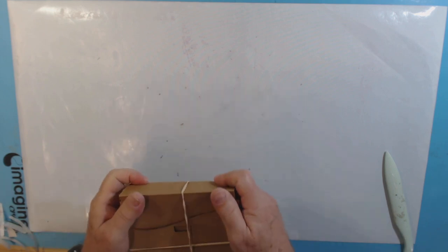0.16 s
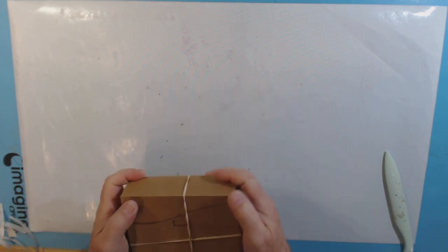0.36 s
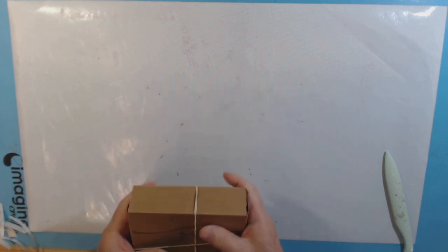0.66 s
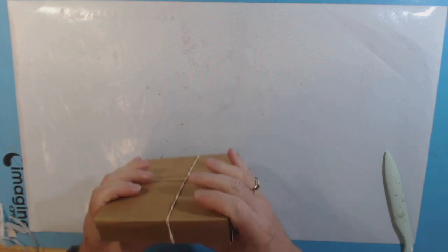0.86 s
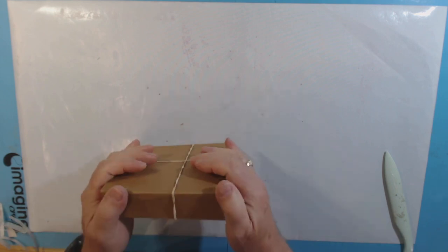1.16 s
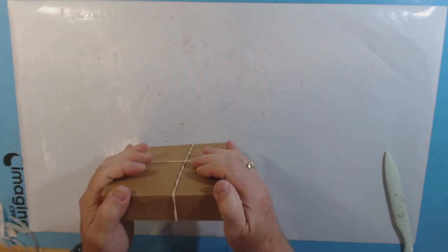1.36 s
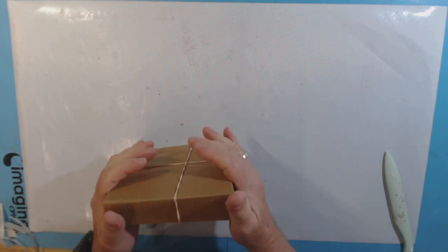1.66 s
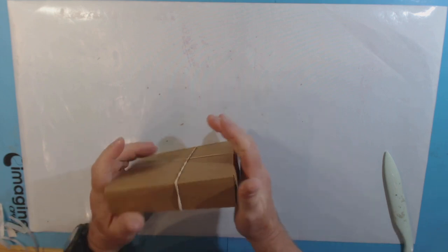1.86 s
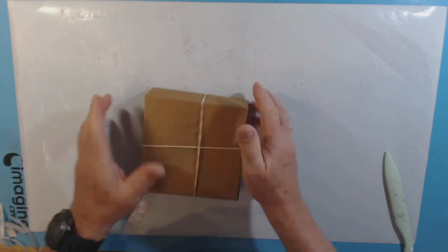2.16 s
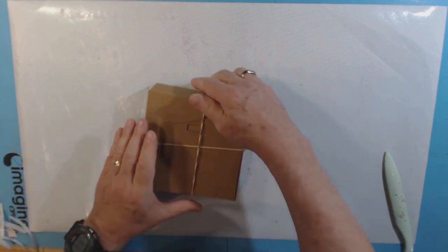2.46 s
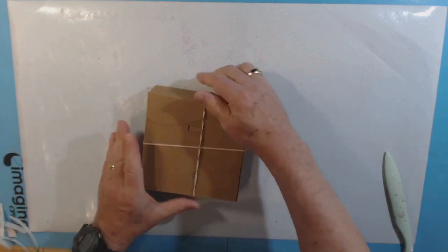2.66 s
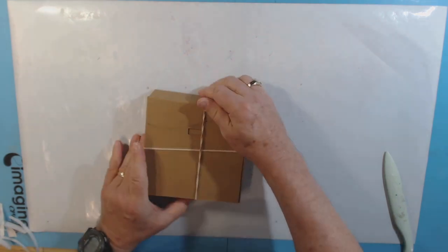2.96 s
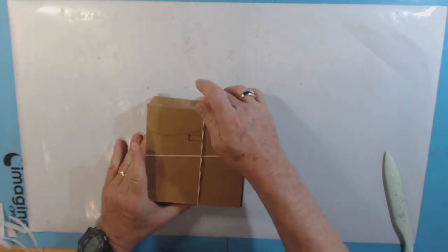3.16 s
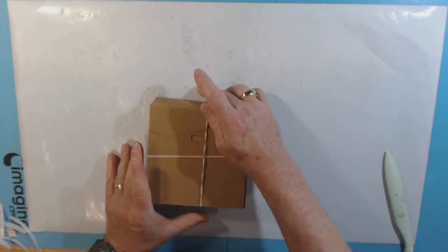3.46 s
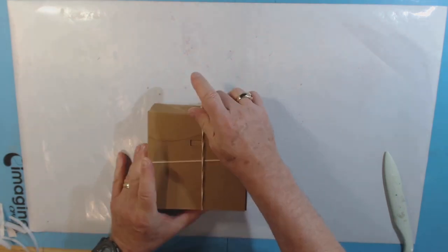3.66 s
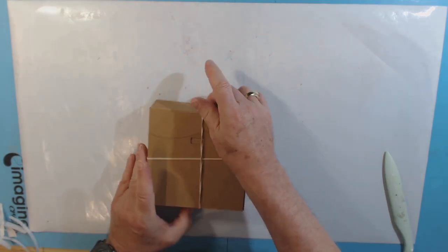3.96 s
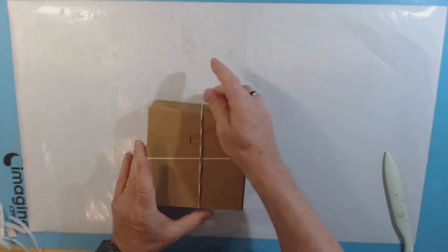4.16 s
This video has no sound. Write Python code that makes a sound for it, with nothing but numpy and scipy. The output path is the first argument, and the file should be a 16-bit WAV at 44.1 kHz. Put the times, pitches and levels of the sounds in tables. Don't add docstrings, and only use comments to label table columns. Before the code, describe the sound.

A folded cardboard box is turned, tapped and dropped on a table, ringing boxy in the mid range. Fingers scrape and rub the card between knocks, with small nail clicks. After a quieter middle and a landing at about 2.3 seconds, bands smack the card hard from 3.2 seconds to the end. Close, narrow webcam sound, almost mono, short room echoes, noise suppression swallowing the tails, hardest snaps distorting.

```python
import sys
import numpy as np
from scipy import signal
from scipy.fft import rfft, irfft, next_fast_len
from scipy.io import wavfile
from scipy.ndimage import uniform_filter1d, map_coordinates

SR = 44100
rng = np.random.default_rng(int(sys.argv[2]) if len(sys.argv) > 2 else 0)


def digitize_waveform(pressure):
    field = np.atleast_2d(pressure).T
    bounded = np.clip(field, -1, 1)
    quanta = np.round(bounded * 32767).astype(np.int16)
    wavfile.write(sys.argv[1], SR, quanta)


def boost(x):
    u = np.asarray(x, float) / 20
    return 10 ** u


N = 190335
SPAN = 8192

# pitch in Hz, width in Hz, level in dB.
BOX_MODES = [(385, 43, 5), (527.3, 78, 6.5), (621.4, 72, 3), (739, 31, 4.5), (934, 140, 0),
             (1000, 110, -3.5), (1260, 240, 0), (1390, 420, -17.5)]
# pitch in Hz, width in Hz, level in dB.
TABLE_MODES = [(100, 37, -11), (152, 61, 0), (248, 73, 4.5)]
# frequency in Hz, level in dB.
SKIN_COLOUR = [(880, -8.5), (1500, -8), (1740, -10), (2320, -9.5), (2530, -8.5), (3860, -14), (6100, -16),
               (7560, -20.5), (8300, -36.5), (10800, -73), (18300, -120)]
# frequency in Hz, level in dB.
CARD_COLOUR = [(590, -24.5), (1000, 3.5), (1140, -6.5), (1350, 7.5), (1540, -2.5), (2090, 2.5), (3910, -3),
               (6540, -3), (7660, -19), (8300, -44), (10800, -94), (18300, -120)]
# frequency in Hz, level in dB.
HUSH_COLOUR = [(15, -38.5), (30, -27.5), (100, -9), (300, -5), (600, -2), (1000, -5.5), (2500, -13),
               (5000, -18.5), (7500, -19.5), (8300, -42.5), (11000, -90)]
# frequency in Hz, time to fall 60 dB in seconds.
ROOM_FADE = [(150, 0.11), (600, 0.093), (2000, 0.11), (7000, 0.073)]
# frequency in Hz, side minus mid in dB.
PORT_SPREAD = [(100, -12.5), (500, -26), (1200, -20), (2200, -27.5), (3600, -20), (4600, -31), (6000, -25),
               (7600, -35)]
# frequency in Hz, left minus right in dB.
PORT_LEAN = [(100, 0), (300, 1.5), (600, 0.34), (1200, 0.26), (2200, 1), (6000, 1)]
# frequency in Hz, threshold in dB a bin.
GATE_THRESHOLD = [(100, -82), (250, -76.5), (500, -64.5), (2000, -67.5), (7000, -80)]
# time in seconds, level in dB.
ROOM_LEAK = [(0.0, -51), (0.1, -53.5), (0.34, -59), (0.83, -64.5), (1.12, -67), (1.67, -70), (1.83, -51),
             (1.96, -66), (2.27, -63), (2.41, -80.5), (2.64, -68.5), (3.15, -67), (3.26, -56.5),
             (3.42, -49.5), (3.5, -57.5), (3.65, -68), (4.0, -64), (4.17, -75.5)]
# start in seconds, peak in dB, pitch in Hz, length in seconds.
PORT_JOLTS = [
    (1.929, -31, 720, 0.0021),
    (2.314, -26, 291, 0.0085),
    (3.199, -3, 71.6, 0.002),
    (3.436, -4.5, 382, 0.0016),
    (3.825, -5, 500, 0.00079),
    (4.152, -11, 384, 0.00072),
]
# start
# in seconds, level in dB, pitch in Hz, time to fall 60 dB in seconds.
LOW_TONES = [
    (0.376, -33, 221, 0.059),
    (1.143, -29, 152, 0.39),
    (1.301, -47.5, 100, 0.17),
    (1.811, -44, 119, 0.19),
    (2.076, -40, 136, 0.18),
    (2.323, -22, 139.3, 0.2),
    (2.575, -43, 137, 0.05),
    (4.153, -22.5, 163.4, 0.058),
]
# start in seconds, box peak in dB, struck panel in Hz,
# table thud in dB.
THUMP_EVENTS = [(0.054, -17, 565, -31.5), (0.624, -19.5, 624, -40.5), (1.1404, 1, 477.7, -12.5),
                (1.281, -30.5, 349, -37.5), (1.806, -21, 365, -33), (2.071, -21.5, 556, -29.5),
                (2.318, -5, 405, -15.5), (2.416, -21, 367, -28), (3.365, -24, 535, -44),
                (3.603, -23.5, 385, -46.5), (3.981, -21, 366, -60.5)]
# start in seconds, box peak in dB, struck panel in Hz,
# table thud in dB, room in dB.
BAND_EVENTS = [
    (3.198, -3, 419, -8, -14),
    (3.375, -10.5, 650, -40.5, -16.5),
    (3.437, -9.5, 332.5, -27.5, -25.5),
    (3.777, -26.5, 636, -46, -6),
    (3.824, -19, 637, -24.5, -32),
    (3.92, -4, 611, -52, -13.5),
    (4.001, -21, 766, -39, -6.5),
    (4.149, -2, 724, -12.5, -5),
]
# start in seconds, box peak in dB, struck panel in Hz.
PAT_EVENTS = [(0.519, -30, 560), (0.555, -5.5, 571), (0.557, -18, 1008), (0.634, -26, 623),
              (0.979, -34.5, 695), (1.293, -28.5, 850), (1.449, -46, 308), (1.513, -41, 382),
              (1.555, -39, 900), (1.594, -22.5, 560), (2.696, -14.5, 581), (2.914, -27.5, 394),
              (3.201, -9.5, 760), (3.438, -13, 656), (3.73, -39, 483), (3.954, -18.5, 578),
              (4.152, -5.5, 502), (4.288, -35, 425)]
# start in seconds, box peak in dB, struck panel in Hz.
TAP_EVENTS = [(0.076, -22, 590), (0.696, -30, 703), (0.808, -24.5, 407), (0.922, -34.5, 709),
              (1.385, -40, 377), (1.726, -33, 385), (1.925, -25, 870), (2.239, -22, 737), (2.325, -7, 845),
              (2.425, -34.5, 954), (2.666, -34.5, 385), (2.803, -17, 776), (2.972, -27, 385),
              (3.31, -27.5, 483), (3.526, -30, 550), (3.558, -15, 752), (3.902, -28, 388)]
# start in seconds, peak in dB, centre in Hz, treble in dB,
# burst length in seconds.
SNAP_EVENTS = [(0.0764, -6.5, 5450, -3.5, 0.0016), (1.1428, -13, 1090, -25, 0.0024),
               (1.924, -5.5, 2900, -11, 0.003), (2.2434, -12.5, 1150, -10.5, 0.0011),
               (2.3214, -10, 1263, -33, 0.0049), (2.3426, -17.5, 1590, -7, 0.0017),
               (2.8021, -22.5, 1270, -31, 0.0034), (3.1977, 2, 1260, -17, 0.0045),
               (3.3666, -7, 2030, -11, 0.0025), (3.3756, -10.5, 3260, -12.5, 0.0015),
               (3.4375, -2, 4625, -9.5, 0.0024), (3.5571, -11, 1390, -53.5, 0.003),
               (3.6052, -14.5, 1860, -18, 0.0021), (3.7762, -18.5, 1270, -9, 0.0039),
               (3.8237, -1.5, 1667, -12.5, 0.0015), (3.922, -7.5, 1270, -18.5, 0.0034),
               (4.1501, 0.5, 1540, -11, 0.01)]
# start in seconds, peak in dB, centre in Hz, treble in dB.
CLICK_EVENTS = [(0.0562, -10.5, 4180, -27), (0.1453, -22.5, 1360, -22), (0.5019, -36.5, 2380, -24),
                (0.5568, -25, 2470, -23), (0.629, -28.5, 2670, -15.5), (0.6977, -28.5, 2970, -24),
                (0.8067, -17.5, 2250, -54.5), (0.9034, -37, 1340, -8), (0.925, -29, 3170, -2.5),
                (1.267, -39.5, 2490, -10.5), (1.293, -35.5, 1997, -38.5), (1.363, -42, 4500, -12.5),
                (1.449, -39, 1450, -30), (1.8078, -25, 3000, -12), (2.4286, -39, 1220, -21),
                (2.698, -28.5, 1263, -20.5), (2.98, -33, 1490, -25.5), (3.0688, -42.5, 2340, -22),
                (3.731, -46.5, 1100, 1), (4.0008, -16.5, 1103, -20.5)]
# fullest moment in seconds, swell in seconds, box
# hum in dB, scrape in dB.
SLIDE_STROKES = [(0.187, 0.034, -38.5, -35), (0.3807, 0.024, -26.5, -29.5), (.76, 0.14, -50, -55),
                 (1.605, 0.032, -49, -55), (2.082, 0.017, -34, -38), (1.829, 0.033, -41, -44),
                 (1.92, 0.002, -46.5, -36), (1.765, 0.031, -57, -43), (3.762, 0.029, -36.5, -55),
                 (1, 0.0089, -36, -61), (3.196, 0.0026, -26, -29.5), (6, 0.0024, -41, -27)]
# fullest moment in seconds, swell in seconds, box hum in dB,
# scrape in dB.
RUB_STROKES = [(0.121, 0.098, -39, -49.5), (.265, 0.043, -38, -40), (0.438, 0.046, -38, -46.5),
               (0.658, 0.043, -57.5, -62.5), (1.298, 0.028, -45, -47), (2.631, 0.042, -47, -54.5),
               (3.329, 0.048, -37, -49), (3.53, 0.035, -46.5, -41.5), (3.021, 0.047, -32, -45.5),
               (3.13, 0.03, -61.5, -52.5), (4.302, 0.038, -47, -54.5)]
# fullest moment in seconds, swell in seconds, box hum in dB,
# scrape in dB.
CREEP_STROKES = [
    (1.019, 0.087, -54, -54.5),
    (1.135, 0.012, -49.5, -48),
    (1.575, 0.038, -48.5, -54),
    (1.901, 0.06, -49, -49),
    (2.8, 0.017, -40.5, -46),
    (2.155, 0.068, -44.5, -49),
    (2.923, 0.023, -38, -49.5),
    (3.089, 0.021, -49.5, -53.5),
    (3.808, 0.036, -39, -43.5),
]
# fullest moment in seconds, swell in seconds, box hum in dB,
# scrape in dB.
DRAG_STROKES = [
    (0.047, 0.021, -34, -35.5),
    (0.511, 0.02, -41, -48),
    (2.328, 0.0081, -23.5, -27),
    (3.42, 0.019, -37.5, -42.5),
    (3.96, 0.021, -40, -48.5),
]

THUMP_S, BAND_S, PAT_S, TAP_S, CLICK_S = 0.0031, 0.0028, 0.004, 0.0036, 0.0024
THUMP_ROOM_DB, ROOM_PER_DB, PAT_ROOM_DB, TAP_ROOM_DB = -6.5, -0.2, -8.5, -0.57
CLICK_ROOM_DB, SNAP_ROOM_DB = -0.5, -4.5
FINGER_THUD_DB = -44
STREAK_DB = 3.3
# (fade over swell, hiss over scrape in dB)
SLIDE, RUB, CREEP, DRAG = (0.89, -6.5), (0.72, -27), (0.41, -13), (2.83, -11.5)


def unit(x):
    return x / np.sqrt(np.mean(x ** 2) + 1e-20)


def strongest(x):
    return x / np.sqrt(np.abs(uniform_filter1d(x ** 2, size=220)).max() + 1e-20)


def along(points, hz):
    f, v = np.transpose(points)
    return np.interp(np.log(hz + 1), np.log(f + 1), v)


def filtered(x, response):
    n = x.shape[-1]
    m = next_fast_len(n + 8192)
    return irfft(rfft(x, m) * response(np.fft.rfftfreq(m, 1 / SR)), m)[..., :n]


def resonance(f, centre, width):
    return 1j * f * width / (centre * centre - f * f + 1j * f * width)


def resonances(modes):
    return lambda f: sum((-1) ** k * boost(db) * resonance(f, centre, width)
                         for k, (centre, width, db) in enumerate(modes))


def wobble(rate):
    knots = rng.standard_normal(int(N * rate / SR) + 4)
    return map_coordinates(knots, [np.arange(N) * rate / SR])


def patchy(shape, over_hz, over_time):
    blurred = uniform_filter1d(rng.standard_normal(shape), size=over_hz, axis=-2)
    return unit(uniform_filter1d(blurred, size=over_time, axis=-1))


def tail(late_db, late_t60, hold_s):
    hz, t, z = signal.stft(rng.standard_normal((2, SPAN)), SR, nperseg=256)
    early = boost(-60 * t / along(ROOM_FADE, hz)[:, None])
    fade = early + boost(late_db - 60 * t / late_t60)
    streaks = STREAK_DB * patchy(fade.shape, 2, 24)
    uneven = 2.5 * rng.standard_normal((len(hz), 1))
    letting_go = 10 * (t / hold_s) ** 4
    fade = fade * boost(streaks + uneven - letting_go)
    return signal.istft(z * fade, SR, nperseg=256)[1][:, :SPAN]


def add(out, s, near, colour, room_db):
    hold_s = 0.11 * np.abs(near).max() ** 0.3 + 0.024
    answer = filtered(tail(late_db=-19, late_t60=0.51, hold_s=hold_s), colour)
    answer *= boost(room_db) * np.linalg.norm(near) / np.linalg.norm(answer[0])
    start = round(s * SR)
    out[0, start:start + SPAN] += near
    out[:, start + 220:start + 220 + SPAN] += answer


def hush():
    z = signal.stft(rng.standard_normal((2, N)), nperseg=512)[2]
    flutter = boost(1.2 * patchy(z.shape[1:], 5, 4))
    noise = signal.istft(z * flutter, nperseg=512)[1][:, :N]
    leak_db = np.interp(np.arange(N) / SR, *np.transpose(ROOM_LEAK)) + 4 + 2.2 * wobble(30)
    return boost(leak_db) * unit(filtered(noise, lambda hz: boost(along(HUSH_COLOUR, hz))))


def stroke_rows():
    kinds = [(SLIDE_STROKES, SLIDE), (RUB_STROKES, RUB), (CREEP_STROKES, CREEP), (DRAG_STROKES, DRAG)]
    return [(s, swell, swell * fade, hum, scrape, scrape + hiss)
            for rows, (fade, hiss) in kinds for s, swell, hum, scrape in rows]


def rubbing():
    t, press = np.arange(N) / SR, np.zeros((3, N))
    for s, swell, fade, *levels in stroke_rows():
        shape = np.exp(-((t - s) / np.where(t < s, swell, fade)) ** 2)
        press += np.outer(boost(levels), shape)
    slips = boost(1.4 * wobble(45) + 3 * wobble(400)) * rng.standard_normal((2, N))
    clumps = boost(3.5 * wobble(40)) * rng.standard_normal((2, N))
    box = resonances(BOX_MODES[:6])
    hum = unit(filtered(clumps, lambda f: box(f) * resonance(f, 710, 860) ** 2))
    scrape = unit(filtered(slips, lambda hz: boost(along(CARD_COLOUR, hz)) / (1 + (hz / 3800) ** 8)))
    hiss = unit(filtered(slips, lambda hz: boost(along(CARD_COLOUR, hz)) / (1 + (3800 / (hz + 1)) ** 8)))
    return press[0] * hum + press[1] * scrape + press[2] * hiss


def knock_rows():
    rows = [(s, db, hz, thud, THUMP_S, THUMP_ROOM_DB + ROOM_PER_DB * db) for s, db, hz, thud in THUMP_EVENTS]
    rows += [(s, db, hz, thud, BAND_S, room) for s, db, hz, thud, room in BAND_EVENTS]
    rows += [(s, db, hz, db + FINGER_THUD_DB, PAT_S, PAT_ROOM_DB) for s, db, hz in PAT_EVENTS]
    return rows + [(s, db, hz, db + FINGER_THUD_DB, TAP_S, TAP_ROOM_DB) for s, db, hz in TAP_EVENTS]


def knocks():
    out, t = np.zeros((2, N + 2 * SPAN)), np.arange(SPAN) / SR
    table = resonances(TABLE_MODES)
    for s, box_db, panel_hz, thud_db, contact_s, room_db in knock_rows():
        u = t / contact_s
        push = u * np.exp(-2.5 * u)
        modes = [(hz, width, db + 1.7 * rng.standard_normal()) for hz, width, db in BOX_MODES]
        box = resonances(modes + [(panel_hz, 0.049 * panel_hz, 4)])
        near_panel = lambda f: resonance(f, panel_hz, 1.3 * panel_hz) ** 2
        reach = lambda f: box(f) * near_panel(f)
        chatter = push * (np.sin(2 * np.pi * panel_hz * t) + 1.1 * rng.standard_normal(SPAN))
        damped = strongest(filtered(chatter, near_panel))
        ringing = strongest(filtered(chatter, reach))
        swing = strongest(damped + boost(room_db + 1) * ringing)
        add(out, s, boost(box_db - 6.5) * swing, reach, room_db)
        thud = strongest(filtered(push, table))
        add(out, s, boost(thud_db - 3.5) * thud, table, room_db - 4)
    return out[:, :N]


def crack_rows():
    snaps = [(*row, SNAP_ROOM_DB) for row in SNAP_EVENTS]
    return snaps + [(*row, CLICK_S, CLICK_ROOM_DB) for row in CLICK_EVENTS]


def cracks():
    out, t = np.zeros((2, N + 2 * SPAN)), np.arange(-44, SPAN - 44) / SR
    for s, peak_db, patch_hz, top_db, burst_s, room_db in crack_rows():
        u = np.maximum(t, 0) / burst_s
        slap = u ** 1.85 * (np.exp(-2.5 * u) + 6 * np.exp(-8 * u))
        bass_cut = lambda f: f ** 2 / (f ** 2 + 700 ** 2)
        treble = lambda f: 1 + (boost(top_db + 10.5) - 1) / (1 + (4300 / (f + 1)) ** 6)
        skin = lambda f: boost(along(SKIN_COLOUR, f)) * bass_cut(f) * treble(f)
        patch = lambda f: resonance(f, patch_hz, 0.1 * patch_hz)
        burst = filtered(slap * rng.standard_normal(SPAN), lambda f: skin(f) * (0.26 + patch(f)))
        walls = lambda f: skin(f) * (1 + 0.35 * patch(f))
        add(out, s - 0.001, boost(peak_db) * burst / np.abs(burst).max(), walls, room_db)
    return out[:, :N]


def drops():
    out, t = np.zeros((2, N + 2 * SPAN)), np.arange(2 * SPAN) / SR
    for s, db, hz, t60 in LOW_TONES:
        onset = 1 - np.exp(-t / 0.0015)
        boom = boost(db - 60 * t / t60) * onset * np.sin(2 * np.pi * hz * t)
        out[:, round(s * SR):][:, :len(t)] += boom
    return out[:, :N]


def jolts():
    out, t = np.zeros((2, N + SPAN)), np.arange(SPAN) / SR
    for s, peak_db, hz, length_s in PORT_JOLTS:
        u = t / length_s
        rough = 0.5 * uniform_filter1d(rng.standard_normal(SPAN), size=3)
        swing = u * np.exp(1 - u) * (np.cos(2 * np.pi * hz * t) + rough)
        out[0, round(s * SR):][:SPAN] += boost(peak_db) * swing
    return out[:, :N]


def suppressed(x):
    hz, _, z = signal.stft(x, SR, nperseg=512, noverlap=384)
    power = uniform_filter1d(np.abs(z[0]) ** 2, size=7, axis=0)
    power = np.abs(uniform_filter1d(power, size=5, axis=1))
    threshold = boost(2 * along(GATE_THRESHOLD, hz))[:, None]
    keep = (power / (power + threshold)) ** 1.4
    return signal.istft(z * keep, SR, nperseg=512, noverlap=384)[1][:, :N]


def scene():
    mid, other = suppressed(rubbing() + knocks() + cracks() + drops()) + hush()
    side = filtered(other, lambda hz: boost(along(PORT_SPREAD, hz)))
    ports = np.array([mid + side, mid - side])
    leaning = filtered(ports, lambda hz: boost(np.outer([0.5, -0.5], along(PORT_LEAN, hz))))
    return leaning + jolts()


def roll_off(x):
    return signal.sosfilt(signal.butter(12, 8860, fs=SR, output="sos"), x)


def record(dry):
    treble_cut = lambda hz: 1 / np.sqrt(1 + (hz / 7700) ** 80)
    bass_cut = lambda hz: hz ** 2 / (hz ** 2 + 45 ** 2)
    narrow = filtered(dry, lambda hz: treble_cut(hz) * bass_cut(hz))
    clipped = narrow / (1 + np.abs(narrow / 1.03) ** 12) ** (1 / 12)
    return roll_off(clipped)


dry = scene()
out = record(dry)
digitize_waveform(out)
```